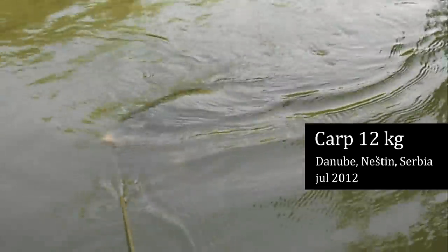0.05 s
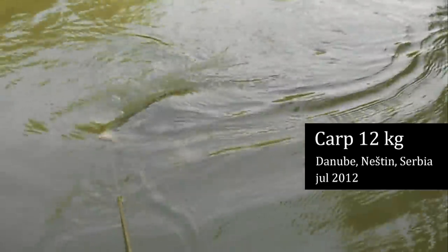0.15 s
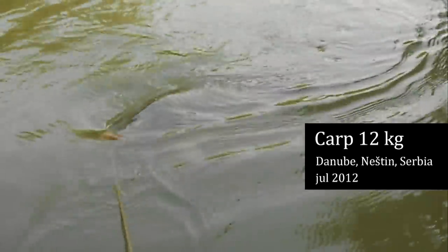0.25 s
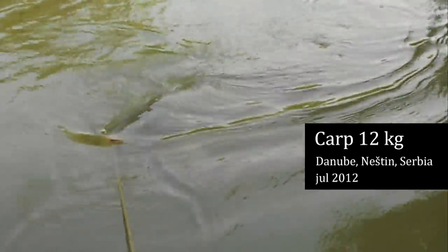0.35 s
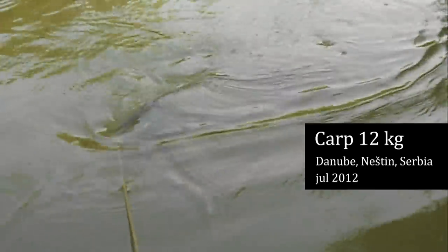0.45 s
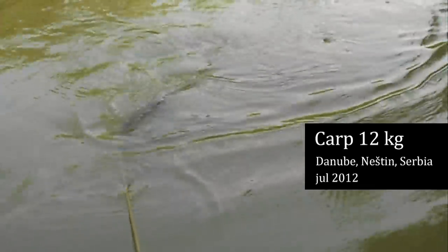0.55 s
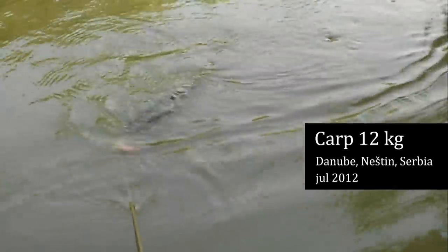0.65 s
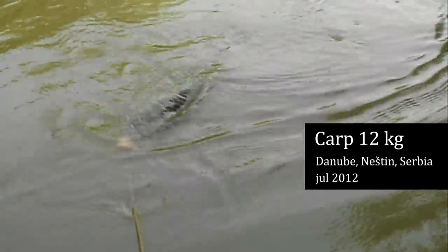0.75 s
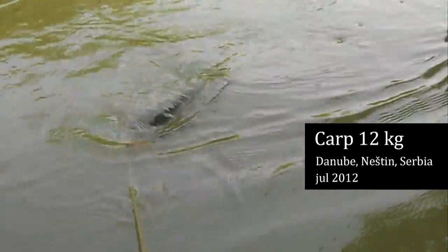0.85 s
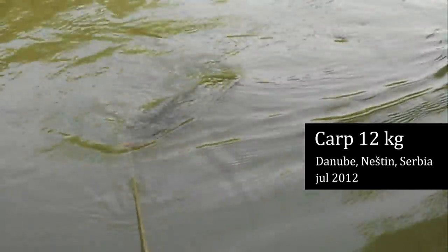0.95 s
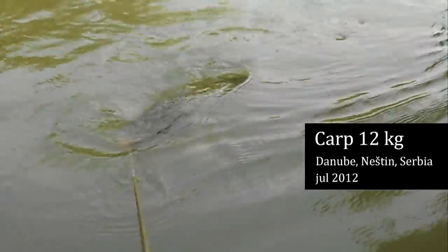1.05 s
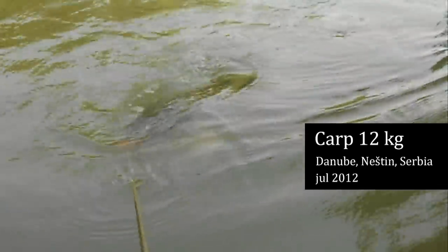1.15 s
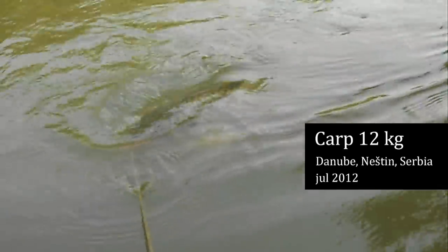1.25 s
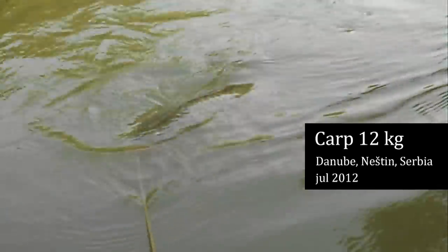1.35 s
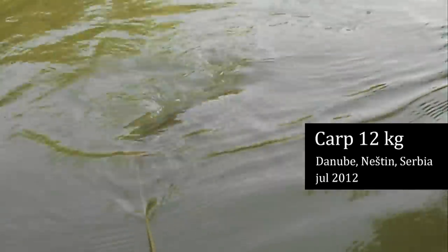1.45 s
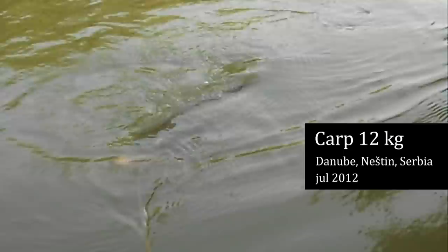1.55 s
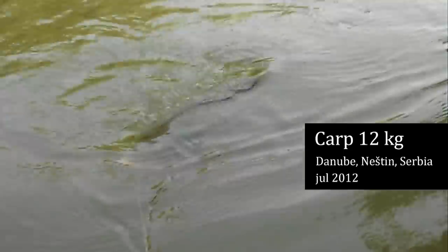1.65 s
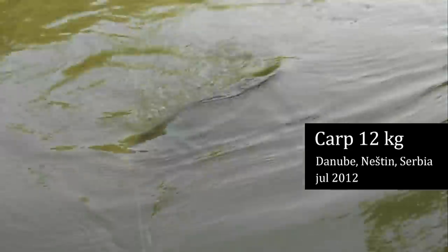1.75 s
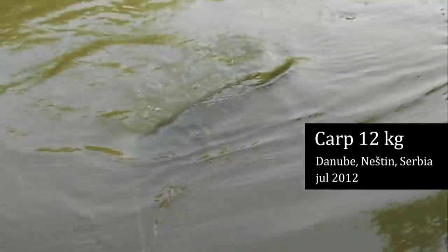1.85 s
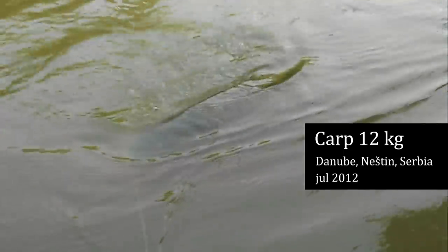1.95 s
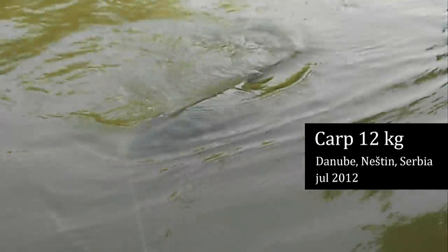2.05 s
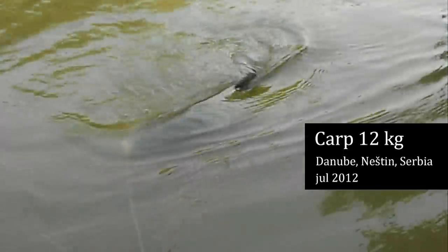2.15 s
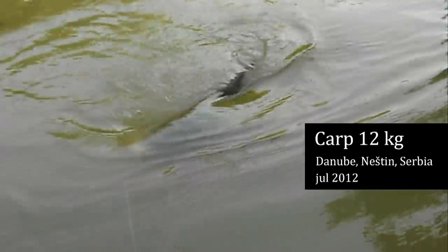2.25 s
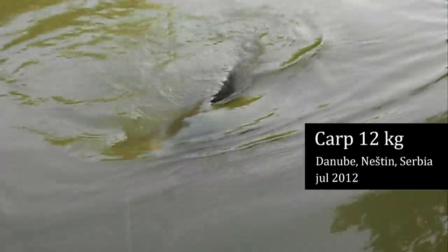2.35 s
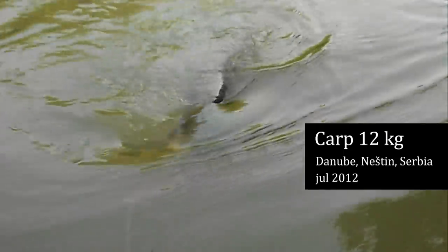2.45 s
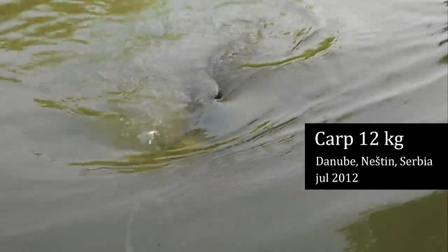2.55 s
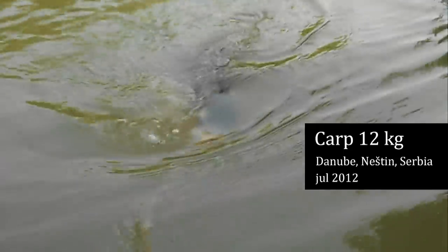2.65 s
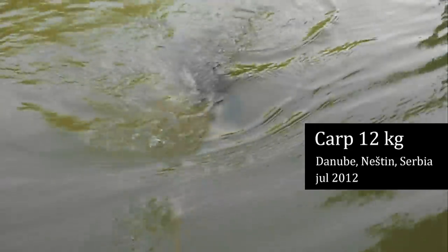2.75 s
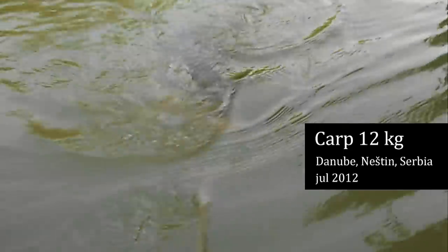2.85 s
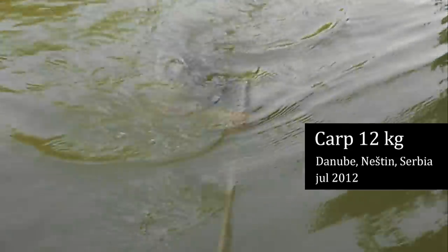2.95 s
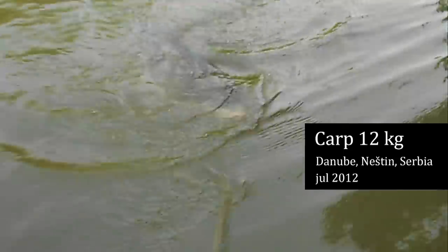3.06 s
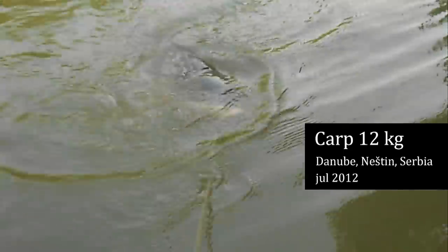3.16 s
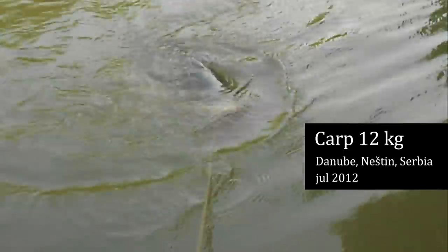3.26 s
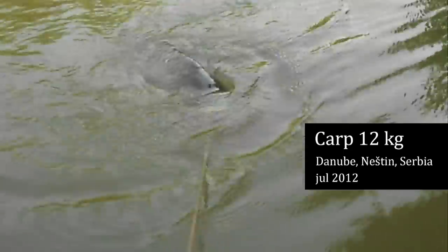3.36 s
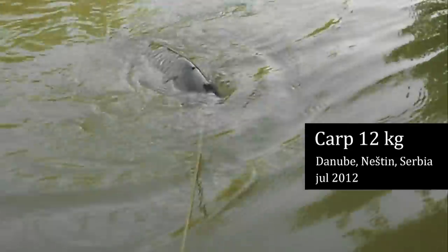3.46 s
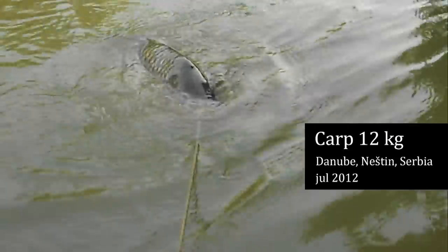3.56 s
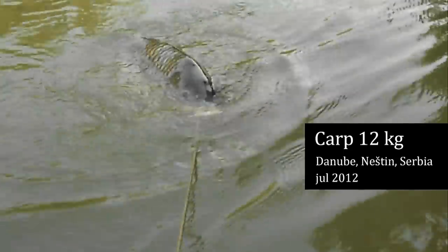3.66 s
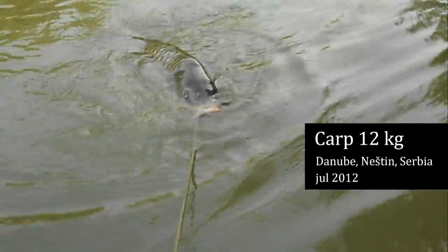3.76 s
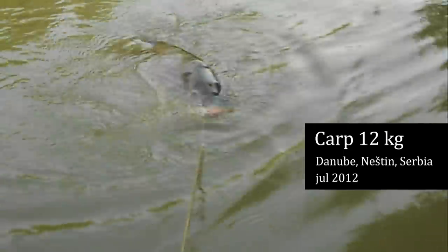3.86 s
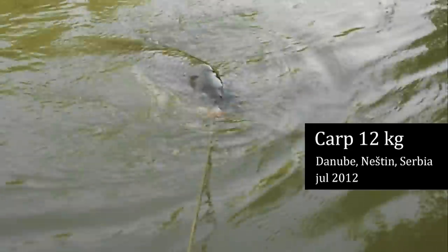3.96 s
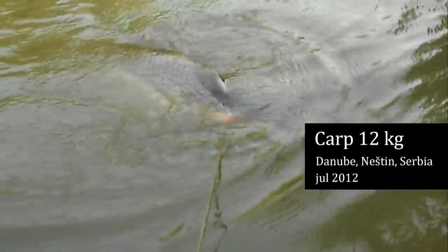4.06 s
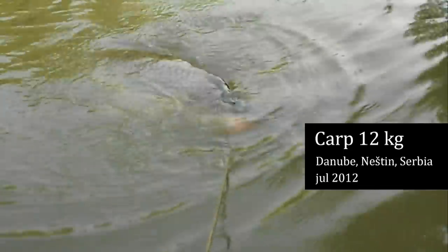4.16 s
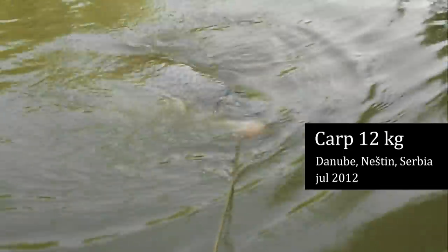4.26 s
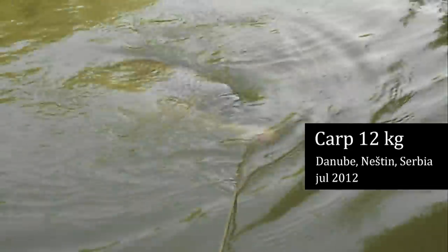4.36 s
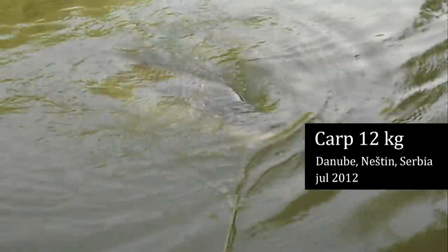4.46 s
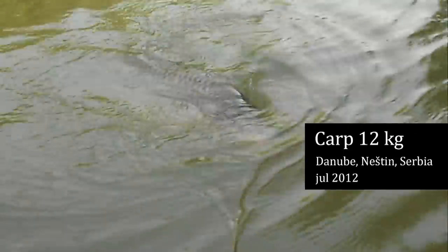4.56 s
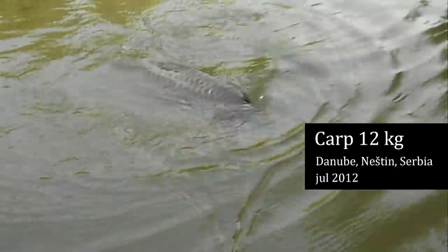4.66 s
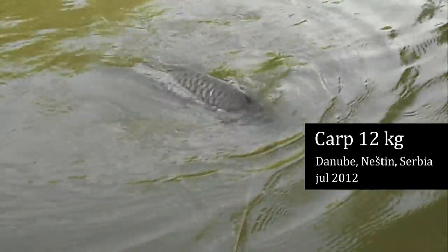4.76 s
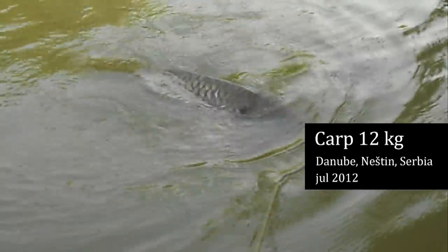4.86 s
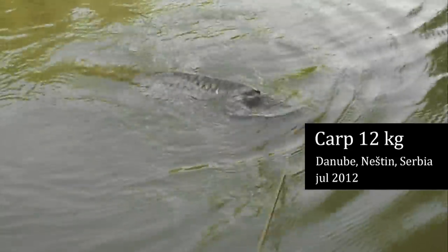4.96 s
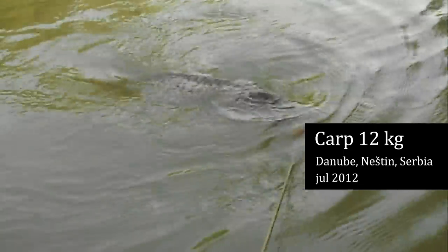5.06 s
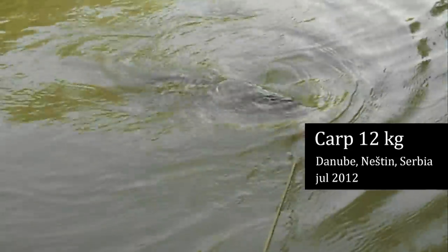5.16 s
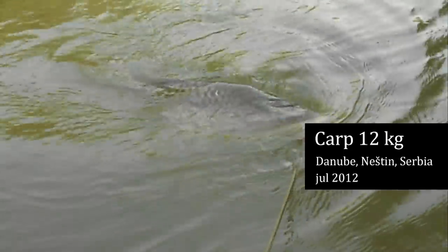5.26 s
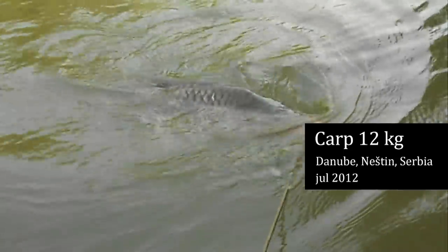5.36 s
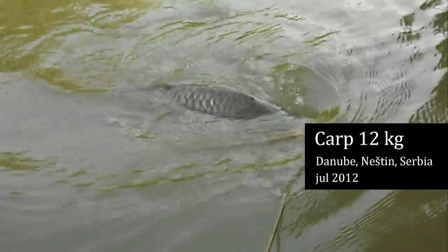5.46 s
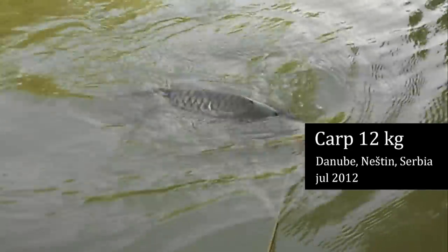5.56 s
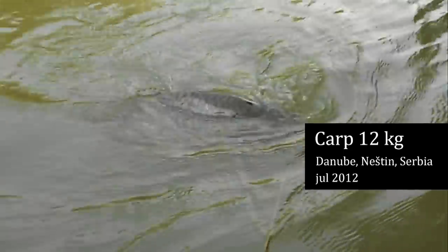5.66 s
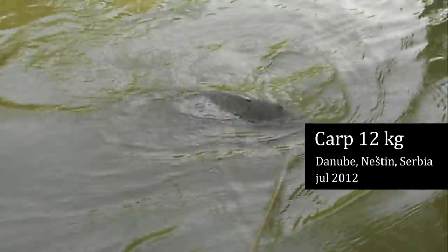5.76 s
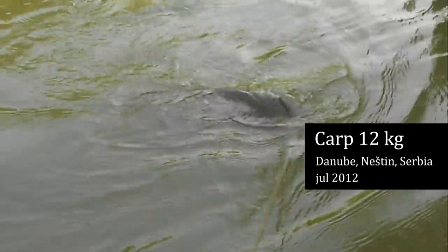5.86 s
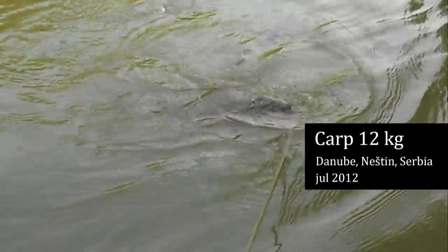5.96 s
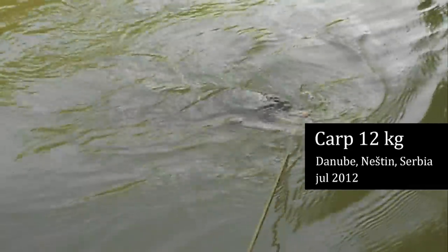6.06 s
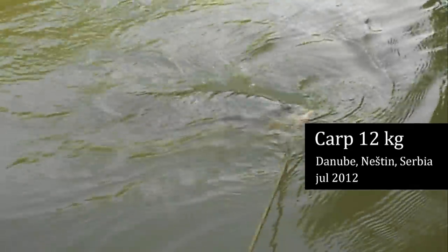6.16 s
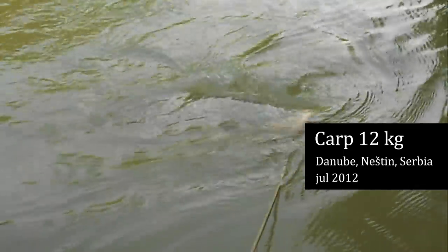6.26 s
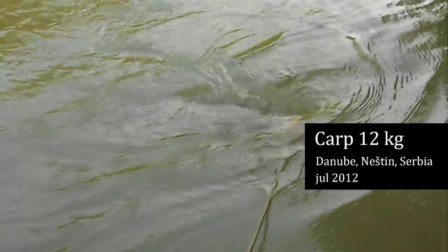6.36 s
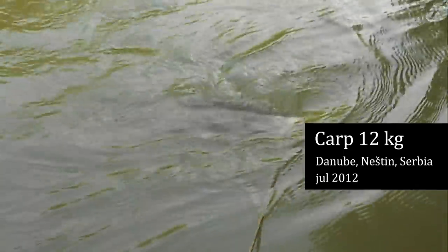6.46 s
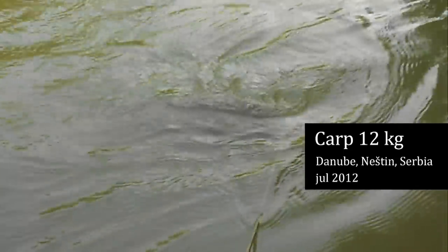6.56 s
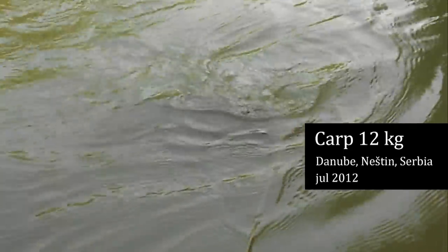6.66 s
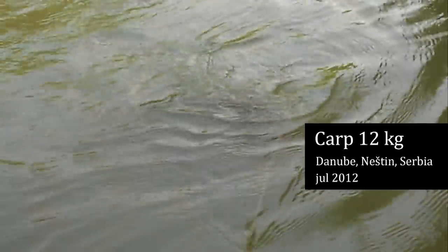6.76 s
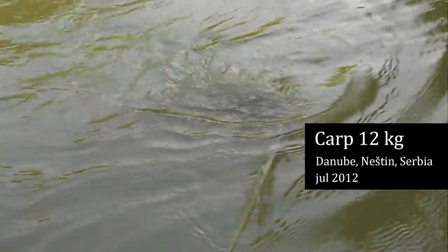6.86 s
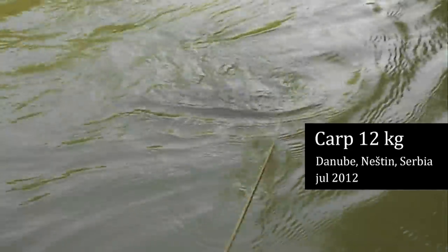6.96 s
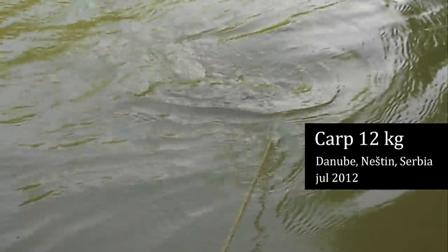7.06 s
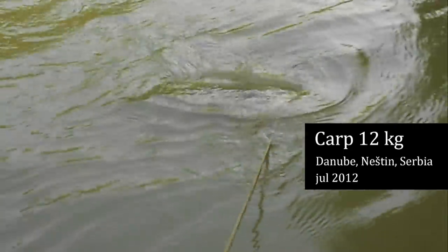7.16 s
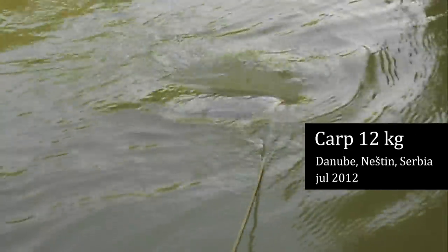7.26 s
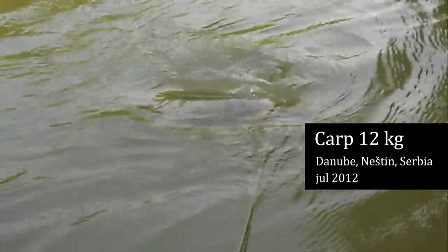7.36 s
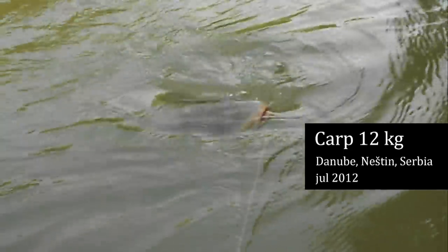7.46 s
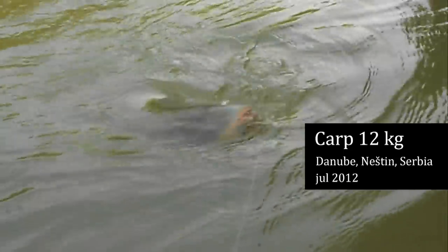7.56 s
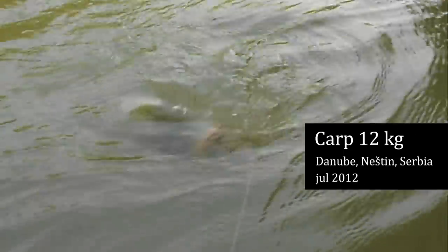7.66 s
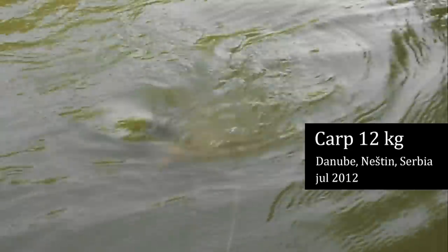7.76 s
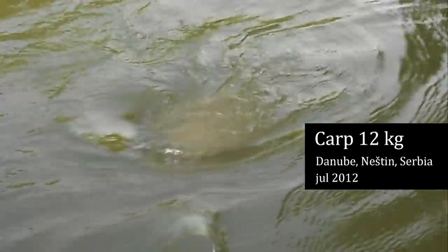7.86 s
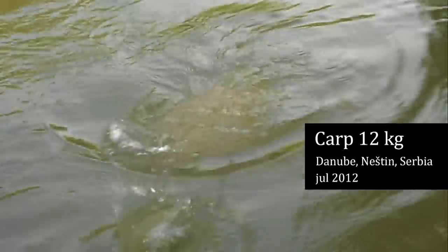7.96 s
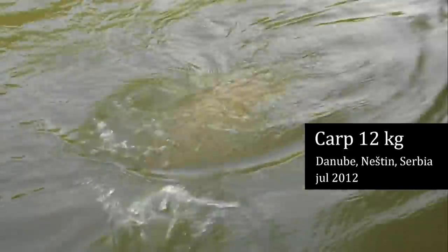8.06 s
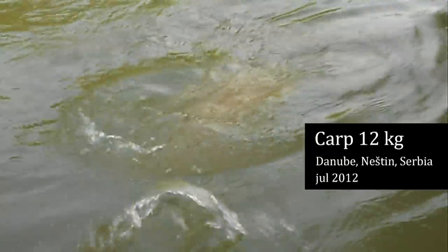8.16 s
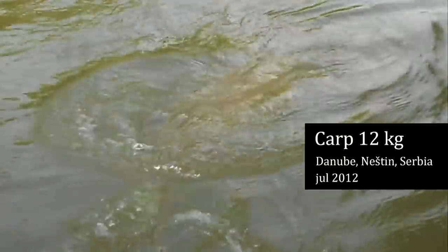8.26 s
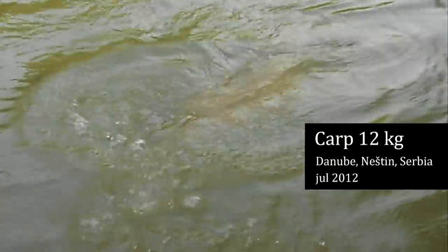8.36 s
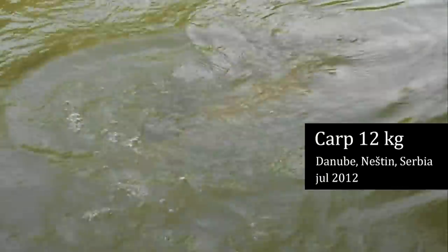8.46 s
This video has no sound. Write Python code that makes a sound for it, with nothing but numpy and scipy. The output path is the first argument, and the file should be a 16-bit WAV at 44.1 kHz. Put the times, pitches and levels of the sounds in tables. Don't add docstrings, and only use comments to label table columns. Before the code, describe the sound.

Quiet riverside with thin birdsong and scattered watery plops, ending in a sudden loud splash, gulping bubbles and falling spray.

```python
import sys
import numpy as np
from scipy import signal
from scipy.fft import rfft, irfft, next_fast_len
from scipy.io import wavfile
from scipy.ndimage import uniform_filter1d, map_coordinates

SR = 44100
rng = np.random.default_rng(int(sys.argv[2]) if len(sys.argv) > 2 else 0)


def ratio(d):
    e = np.asarray(d, float) / 20
    return 10 ** e


def generate_wav(signal):
    frames = np.transpose(np.atleast_2d(signal))
    scaled = np.clip(frames, -1, 1) * 32767
    pcm = np.round(scaled).astype(np.int16)
    wavfile.write(sys.argv[1], SR, pcm)


N = 374850

# [t/s, peak level/dB, starting f/Hz, rise/octaves, life/s]
GULPS = [(1.413, -39, 1460, 0.67, .0087), (1.509, -45, 626, 0.41, 0.043), (1.619, -30, 800, 1.1, .019),
         (1.657, -37, 1062, .61, 0.025), (2.65, -47, 1480, .06, .018), (2.725, -44, 560, .5, .03),
         (2.775, -40, 606, 1.1, .031), (5.66, -30, 803, .4, .026), (5.728, -42, 1520, .37, .01),
         (6.394, -31.5, 824, 1.13, 0.021), (7.551, -38, 920, 0.29, .018), (7.69, -36, 620, .1, .015),
         (7.704, -28, 680, .2, .03), (7.745, -36, 734, 0.77, .034), (7.783, -16, 950, .4, 0.016),
         (7.871, -47, 1750, .82, .025), (7.901, -32, 1153, .63, .019), (7.949, -28.5, 1350, .45, .0063),
         (8.062, -12.5, 1240, 0.51, 0.0042), (8.072, -29.5, 784, 0.45, 0.026),
         (8.273, -27.5, 734, 0.32, .024), (8.23, -52, 3300, -.6, .015), (8.32, -46, 2310, .8, .014),
         (8.325, -41, 370, .45, .045), (8.478, -54, 1600, 1.4, .01), (4.92, -48, 950, .8, .025),
         (8.395, -21.5, 1296, .29, 0.0082), (8.41, -34.5, 703, .53, .024)]
# [t/s, peak level/dB, f/Hz, life/s]
PLOPS = [(1.66, -36.5, 1650, 0.005), (2.62, -53, 1900, .012), (3.759, -38, 1180, .005),
         (5.359, -28, 960, .006), (5.603, -33, 654, 0.014), (5.63, -32, 1132, 0.017),
         (5.726, -35, 867, .017), (5.85, -36, 799, .036), (5.972, -34, 690, .011),
         (6.267, -34.5, 1610, .0092), (6.28, -36.5, 1118, .032), (6.318, -22.5, 682, .014),
         (6.572, -38, 900, 0.0053), (7.033, -43, 930, 0.012), (7.591, -38, 1500, .009),
         (7.708, -42, 1450, .008), (7.933, -31, 532, .04), (7.965, -27.5, 1130, .016),
         (7.996, -39, 1100, 0.0092), (8.007, -28, 1110, .0061), (8.018, -33, 825, .041),
         (8.06, -7.5, 756, 0.009), (8.075, -40, 1200, .023), (8.095, -35, 856, .036),
         (8.137, -48, 1550, .012), (8.152, -45, 1760, .012), (8.189, -50, 770, .015), (8.3, -47, 900, .05),
         (7.789, -26, 1130, .012), (7.933, -25, 620, .004), (7.618, -44, 1450, .012),
         (3.882, -45, 1100, .006), (7.722, -38, 1180, .006), (8.255, -23, 1050, 0.0027),
         (8.403, -32, 1043, .019)]
PLOP_RISE_OCTAVES = 0.049
# [t/s, peak level/dB, level of the tick's body relative to the peak/dB]
DROPS = [(.415, -70, 4), (1.467, -40, -8), (1.474, -38, -9), (1.5977, -38, -25), (2.6, -54, -10),
         (2.678, -49, -6), (7.782, -40, -4), (7.875, -42, -6), (8.153, -44, -8), (8.345, -44, -8),
         (2.728, -44, -26), (4.8569, -47, -17), (5.354, -39, -8), (5.485, -38, -13), (5.561, -39, -15),
         (5.8302, -31, -20), (5.985, -36.5, -22), (6.2661, -40, -5), (7.011, -38.5, -15),
         (7.063, -41.5, -13), (7.519, -34, -26), (7.6182, -33.5, -14), (7.636, -37, -20),
         (7.7246, -35.5, -13), (7.9168, -29, -29), (7.964, -33, -9), (7.9916, -34, 6), (7.997, -27, -17),
         (8.0702, -26, -10), (8.125, -32, -16), (8.2107, -43, -17), (8.278, -30, -8), (8.3228, -33, -12),
         (8.364, -33, -20), (8.382, -27.5, -8), (8.3996, -26, -7), (8.45, -36, -22)]
# [t/s, peak level/dB, ringing f/Hz]
SLAPS = [(1.416, -47, 1910), (1.467, -50, 1750), (1.467, -48, 3200), (1.475, -41, 2950), (1.474, -45, 3700),
         (7.528, -52, 3800), (7.655, -53, 3100), (7.711, -48, 3150), (7.711, -52, 4050), (7.76, -50, 3800),
         (7.884, -50, 4500), (7.933, -46, 3000), (8.063, -30, 1500), (8.256, -36, 1600), (8.413, -50, 4500),
         (8.46, -52, 3300), (8.495, -52, 3100), (2.675, -53, 1620), (2.735, -57, 4900), (2.77, -57, 4600),
         (3.76, -48, 1500), (5.364, -46, 4270), (5.388, -40, 3350), (5.405, -51, 4200), (5.428, -51, 3100),
         (5.83, -44, 3900), (6.251, -43, 3880), (6.267, -38, 2270), (7.519, -48, 3550), (7.578, -51, 4300),
         (7.721, -39.5, 3120), (7.787, -40, 1930), (7.801, -46, 3600), (7.902, -38, 3300),
         (7.991, -17, 3330), (7.997, -23, 2800), (8.013, -27, 2800), (8.017, -26, 1750), (8.061, -24, 2140),
         (8.381, -44, 3500), (8.399, -32, 3500), (5.356, -42, 6200)]
SLAP_T60_S, SOFTER_S_PER_DB = .005, .00015
# [t/s, fizz level/dB, slosh over fizz/dB, swell/s, fall/s]
THROWS = [(7.64, -63, 14.5, .6, 0.17), (7.71, -58, 9, 0.09, .6), (7.89, -56, 12.5, 0.36, .3),
          (7.975, -53, 14, 0.22, .05), (7.992, -37, -6, 0.007, .16), (8.022, -39, 0, .05, .12),
          (8.061, -31.5, -13, .006, 0.1), (8.135, -59, 1, .03, 0.089), (8.25, -56, 11, .04, .3),
          (8.325, -51.5, 8.5, .15, 0.058), (8.382, -47, 5, 0.058, 0.2)]
FADE_DB = 31.5
CHURN_DB, CHURN_DEPTH = -7, .25
SLOSH_LINGERS = 1.17

# [share of the length, pitch bend/octaves, level/dB]
FLAT = [(0, -.06, -11), (.12, -.025, -1), (.5, -.004, -2), (1, 0.005, -10)]
SWELL = [(0, -.06, -8), (.4, 0, 0), (1, 0.003, -9)]
CHIP = [(0, 0.012, -8), (.4, -0.022, 0), (1, -0.173, -9)]
DIP = [(0, .31, -6), (.22, 0, -3), (.36, .06, -4), (.6, .2, -0.5), (1, .26, -0.5)]
HOOK = [(0, .45, -18), (.11, 0.0037, 0), (.55, .1, -3), (1, .12, -9)]
ARCH = [(0, -.24, -10), (.16, -.01, -1), (.55, 0, -0.5), (.8, -.14, -1), (1, -.36, -5)]
RISE = [(0, 0, -11), (.5, .52, -16), (.72, .78, 1), (1, 1.1, -10)]
FALL = [(0, -.16, -16), (.06, -.03, -6), (.17, 0, -3.5), (.55, -.14, 0), (.92, -.23, -1), (1, -.52, -15)]
# [t/s, length/s, f/Hz, level/dB, depth of the bend]
FLATS = [
    (5.158, .2, 2570, -58, 1.55),
    (5.721, 0.25, 2493, -55, 0.64),
    (6.293, .2, 2500, -58.5, 0.82),
]
SWELLS = [(.27, .04, 3570, -77, .1), (.485, .045, 3150, -75, .3), (.67, .15, 4005, -70, .8),
          (.95, .12, 3220, -70, -.5), (1.08, .12, 3580, -70, -.9), (1.325, .07, 3040, -68, .5)]
CHIPS = [
    (.12, .075, 3100, -70, .35),
    (2.29, 0.052, 3286, -65, 1.1),
    (2.345, 0.046, 3250, -63.5, 0.74),
    (2.46, 0.035, 3180, -60, 0.67),
    (2.492, 0.031, 2745, -64.5, .9),
    (2.522, .035, 2700, -68, 0.89),
]
DIPS = [
    (2.81, .18, 3370, -64.5, 1.02),
    (3.355, .18, 3396, -65, .92),
]
HOOKS = [
    (3.07, .13, 2672, -65, 1.05),
    (3.62, .13, 2662, -64, .9),
]
ARCHES = [
    (3.97, .25, 3343, -66, 1.01),
    (.3, .125, 2850, -77, .3),
]
RISES = [
    (4.49, .1, 1606, -64.5, 1.01),
    (4.77, .095, 1643, -62.5, 0.92),
]
FALLS = [
    (4.955, 0.14, 3850, -59, 1.04),
    (5.505, 0.14, 3840, -51, 1.01),
    (6.068, .15, 3860, -53, .9),
]
# [t/s, length/s, starting f/Hz, final f/Hz, level/dB]
FAINT_NOTES = [(0, .035, 4010, 3990, -78), (.07, .11, 3980, 4000, -86), (.025, .08, 3300, 3400, -86),
               (.045, .03, 3450, 3620, -79), (.075, .1, 3630, 3600, -81), (.085, .04, 2820, 2700, -79),
               (.13, .07, 2880, 2930, -75), (.215, .03, 3080, 2980, -78), (.26, .06, 3120, 3200, -80),
               (.3, .025, 3840, 3860, -85), (.445, .03, 2800, 2790, -79), (.535, .04, 3150, 3160, -74),
               (6.49, .09, 2490, 2480, -72), (6.6, .17, 2490, 2480, -75), (5.97, .12, 2490, 2490, -72),
               (0.825, 0.046, 4450, 4460, -79), (.86, 0.065, 4560, 4600, -82), (1.17, 0.037, 3000, 2920, -73),
               (1.204, 0.04, 2680, 2630, -78), (1.3, 0.043, 2650, 2800, -75), (4.16, .14, 4600, 4770, -94),
               (4.2, 0.09, 2000, 1990, -85), (7.773, 0.2, 8700, 8150, -84)]
# [start t/s, end t/s, rate f/Hz, depth/Hz]
TRILL = (3.97, 4.16, 62, 90)
# [start t/s, rate f/Hz, depth/dB]
PULSE = (6.29, 27, 4)
FLUTTER_DB, HOARSE_HZ = 1.6, 42
TREES_T60_S = .9

# [t/s, rumble level/dB]
AIR = [(0.0, -49.5), (1.18, -51.5), (1.5, -49), (1.69, -41.5), (2.27, -48), (2.76, -49), (3.29, -47.5),
       (3.96, -48), (4.4, -50), (4.95, -50), (5.12, -46), (5.76, -38.5), (6.2, -40), (6.4, -38.5),
       (7.21, -48.5), (7.52, -48), (7.83, -40), (7.99, -39.5)]
# [f/Hz, density level/dB per Hz]
RUMBLE = [(15, -35), (25, -11.5), (41, -5.5), (60, -0.5), (133, -4.5), (224, -1), (291, 0), (431, -10),
          (725, -12.5), (882, -16), (941, -17), (2400, -33), (4500, -42), (5850, -74), (9900, -120)]
# [f/Hz, level/dB]
WHINE = [(7838, -93), (7897, -81.5)]
# [f/Hz, level/dB]
HUM = (56, -60.5)
HISS_UNDER_DB = 23.5
DUCK_S, DUCK_DB, RECOVER_DB_PER_S, RECOVER_DB = 8.0, -55.5, 15, 5.5
# [f/Hz, gain/dB]
PORT = [(100, 0.5), (3300, 0.5), (4600, -6), (5100, -11), (5600, -21), (6500, 0), (8000, 2), (9800, 10.5),
        (10700, 9), (11000, -12), (11400, 7), (12500, 1), (13700, -17), (14400, -44), (15500, -70)]


def unit(x):
    return x / np.sqrt(np.mean(x ** 2) + 1e-20)


def along(points, hz):
    f, v = np.transpose(points)
    return np.interp(np.log(hz + 1), np.log(f + 1), v)


def wobble(rate):
    knots = rng.standard_normal(int(N * rate / SR) + 4)
    return map_coordinates(knots, [np.arange(N) * rate / SR])


def coloured(x, spectrum):
    m = next_fast_len(N + 8192)
    gain = ratio(along(spectrum, np.fft.rfftfreq(m, 1 / SR)))
    return irfft(rfft(x, m) * gain, m)[..., :N]


def add(track, s, sound):
    part = track[round(s * SR):][:len(sound)]
    part += sound[:len(part)]


def grains(per_s, hz, spread, cycles, scatter_db):
    draw = rng.random((int(per_s * N / SR), 2))
    pitch = hz * np.exp(spread * rng.standard_normal(len(draw)))
    pitch = np.clip(pitch, 300, SR / 3)[:, None]
    turns = pitch * np.arange(384) / SR
    strength = ratio(-scatter_db * np.log(draw[:, 1:] + 0.024))
    ring = np.sin(2 * np.pi * turns * (1 + 0.0078 * turns)) * np.exp(-turns / cycles)
    where = (draw[:, :1] * N).astype(int) + np.arange(384)
    return unit(np.bincount(where.ravel(), (strength * ring).ravel(), N + 384)[:N])


def gulps():
    out, puffs = np.zeros(N), np.zeros(N)
    plops = [(s, db, hz, PLOP_RISE_OCTAVES, life) for s, db, hz, life in PLOPS]
    for s, db, hz, rise, life in list(GULPS) + plops:
        t = np.arange(round(2.5 * life * SR)) / SR
        knots = rng.standard_normal((2, 64))
        pitch_ragged, level_ragged = [np.interp(t * 350, np.arange(64), k) for k in knots]
        climb = rise * np.minimum(t / life, 1.08) ** 1.6
        pitch = hz * 2 ** (climb + .05 * pitch_ragged)
        swell = (1 - np.exp(-t * hz / 1.2)) * np.exp(-1.7 * (t / life) ** 1.5)
        ring = np.sin(2 * np.pi * np.cumsum(pitch) / SR)
        add(out, s, ratio(db - 2 + 1.6 * level_ragged) * swell * ring)
        add(puffs, s, ratio(db - 60 * t / 0.017) * rng.standard_normal(len(t)))
        for late, higher, weaker in rng.random((5, 3)):
            delay = .045 * late
            turns = hz * 2 ** (.9 * higher - .1) * np.arange(900) / SR
            envelope = (1 - np.exp(-turns)) * np.exp(-turns / 3)
            small = np.sin(2 * np.pi * turns * (1 + .006 * turns)) * envelope
            add(out, s + .006 + delay, ratio(db - 18 - 10 * weaker - 150 * delay) * small)
    return out + coloured(puffs, [(350, -32), (700, 7), (1600, -2), (2600, -37), (5000, -40)])


def drops():
    ticks, bodies, slaps = np.zeros((3, N))
    t = np.arange(SR // 20) / SR
    for s, db, body_db in DROPS:
        crack = rng.standard_normal((2, len(t))) * ratio(-60 * t / [[.007], [.008]])
        add(ticks, s, ratio(db - 6) * crack[0])
        add(bodies, s, ratio(db + body_db + 4.5) * crack[1])
    for s, db, hz in SLAPS:
        t60 = max(SLAP_T60_S - SOFTER_S_PER_DB * db, .002)
        phase = 2 * np.pi * hz * t + np.cumsum(0.16 * rng.standard_normal(len(t)))
        onset = 1 - np.exp(-t / 0.00052)
        add(slaps, s, ratio(db + 6 - 60 * t / t60) * onset * np.sin(phase))
    ticks = coloured(ticks, [(4500, -33), (7000, -2.5), (8800, 1)])
    bodies = coloured(bodies, [(900, -33), (2200, 3), (5000, 4.5), (7000, -30)])
    return ticks + bodies + slaps


def thrown(depth, linger):
    t = np.arange(-2 * SR, 0) / SR + N / SR
    s, db, slosh_db, swell, fall = np.transpose(THROWS)[:, :, None]
    away = np.where(t < s, (s - t) / swell, (t - s) / (fall * linger))
    level = np.linalg.norm(ratio(db + depth * slosh_db - FADE_DB * away), axis=0)
    return np.pad(level, (N - len(t), 0))


def spray():
    mist = coloured(rng.standard_normal(N), [(5000, -29), (8500, -3)])
    fizz = grains(900, hz=10000, spread=0.23, cycles=0.75, scatter_db=2.0) + .5 * mist
    churn = grains(500, hz=2800, spread=.35, cycles=5, scatter_db=3.5)
    wash = unit(coloured(rng.standard_normal(N), [(700, -30), (1500, -4), (4000, -3), (6500, -19)]))
    slosh = grains(220, hz=1150, spread=.3, cycles=3.5, scatter_db=3)
    clumps = ratio(2.2 * wobble(160))
    fine = fizz * ratio(-7.5) * thrown(0, 0.9)
    fine += (churn + 0.55 * wash) * ratio(CHURN_DB) * thrown(CHURN_DEPTH, 0.96)
    return clumps * fine + slosh * ratio(-5.5) * thrown(0.91, SLOSH_LINGERS)


def birds():
    song, clock = np.zeros(N), np.arange(N) / SR
    far = [[(s, a, db), (s + long, b, db)] for s, long, a, b, db in FAINT_NOTES]
    sung = [(FLAT, FLATS), (SWELL, SWELLS), (CHIP, CHIPS), (DIP, DIPS),
            (HOOK, HOOKS), (ARCH, ARCHES), (RISE, RISES), (FALL, FALLS)]
    near = [[(s + long * u, hz * 2 ** (depth * bend), db + level) for u, bend, level in shape]
            for shape, notes in sung for s, long, hz, db, depth in notes]
    in_leaves = clock < 1.5
    trill_on, trill_off, trill_hz, trill_depth = TRILL
    trilled = (clock > trill_on) * (clock < trill_off)
    shake = 9 * wobble(70) + HOARSE_HZ * wobble(45) * in_leaves
    shake += trill_depth * np.sin(2 * np.pi * trill_hz * clock) * trilled
    for note in near + far:
        s, hz, db = np.transpose(note)
        t = np.arange(s[0], s[-1], 1 / SR)
        fade = np.clip(np.minimum(t - s[0], s[-1] - t) / 0.0023, 0, 1)
        glide = uniform_filter1d(np.interp(t, s, hz), size=450, mode="nearest")
        pitch = glide + shake[round(s[0] * SR):][:len(t)]
        tone = np.sin(2 * np.pi * np.cumsum(pitch) / SR)
        add(song, s[0], ratio(np.interp(t, s, db) + 11.5) * fade * tone)
    pulse_on, pulse_hz, pulse_depth = PULSE
    pulse_db = pulse_depth * (np.cos(2 * np.pi * pulse_hz * clock) - 1) * (clock > pulse_on)
    song = song * ratio(FLUTTER_DB * wobble(28) + pulse_db)
    t = np.arange(SR) / SR
    decay = ratio(-60 * t / TREES_T60_S) + 1.7 * ratio(-60 * t / 0.12)
    echoes = rng.standard_normal(SR) * decay * (1 - np.exp(-t / 0.0021))
    tail = signal.fftconvolve(song, echoes / np.linalg.norm(echoes))[:N]
    direct_db = np.where(in_leaves, -6, -2.5)
    return song * ratio(1.5 * wobble(55) + direct_db) + ratio(-7) * tail


def background():
    t = np.arange(N) / SR
    after = t - DUCK_S
    ducked_db = DUCK_DB + np.minimum(RECOVER_DB_PER_S * after, RECOVER_DB)
    rumble_db = np.where(after < 0, np.interp(t, *np.transpose(AIR)), ducked_db)
    hiss_db = rumble_db - HISS_UNDER_DB
    rumble = unit(coloured(rng.standard_normal(N), RUMBLE)) * ratio(rumble_db + 0.3 * wobble(6))
    ripples = grains(300, hz=9500, spread=.2, cycles=1.3, scatter_db=2.5)
    hiss = unit(rng.standard_normal(N) + .3 * ripples)
    hiss = coloured(hiss, [(500, -17), (2500, 3.5), (5000, 0.5)]) * ratio(hiss_db - 1 + 0.62 * wobble(26))
    whine = sum(ratio(db + 1) * np.sin(2 * np.pi * hz * t + .6 * wobble(20)) for hz, db in WHINE)
    hum_hz, hum_db = HUM
    hum = ratio(hum_db + 3.5 * wobble(4.2)) * np.sin(2 * np.pi * hum_hz * t + 0.71 * wobble(3.2))
    return rumble + hiss + (whine + hum) * ratio(hiss_db - np.median(hiss_db))


def scene():
    water = gulps() + drops()
    t = np.arange(SR // 5) / SR
    bank = rng.standard_normal(len(t)) * ratio(-60 * t / 0.1)
    reflected = signal.fftconvolve(water, bank / np.linalg.norm(bank))[:N]
    answer = coloured(reflected, [(3500, -0.5), (7000, -12)])
    return (water + ratio(-9.5) * answer + spray() + birds() + background())[None]


def band_limit(x):
    return signal.sosfilt(signal.butter(12, 14360, fs=SR, output="sos"), x)


def record(dry):
    mix = coloured(dry, PORT)
    return band_limit(mix)


dry = scene()
out = record(dry)
generate_wav(out)
```